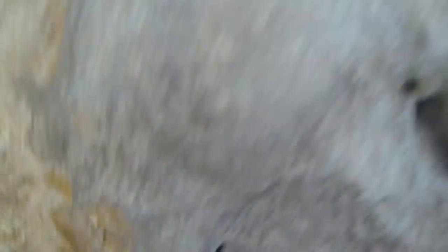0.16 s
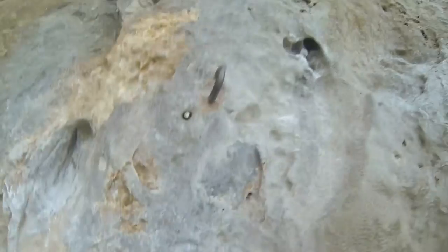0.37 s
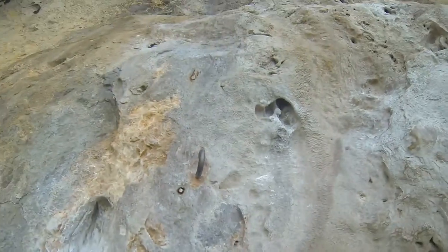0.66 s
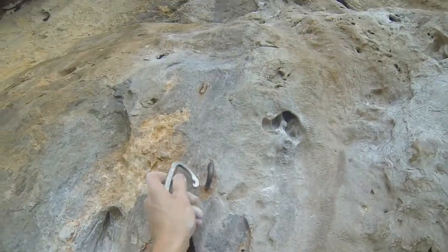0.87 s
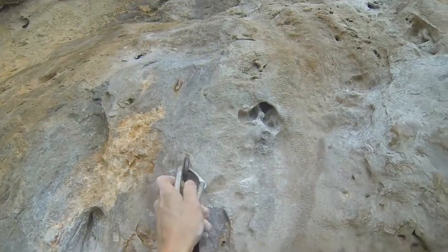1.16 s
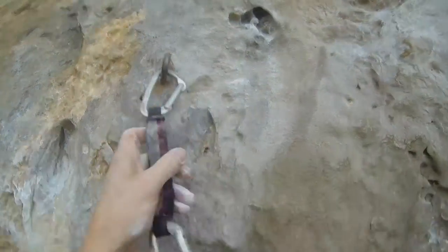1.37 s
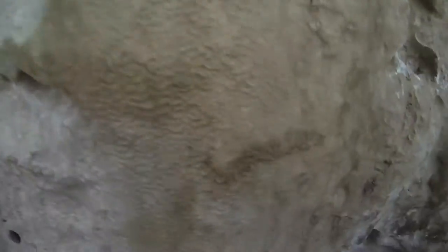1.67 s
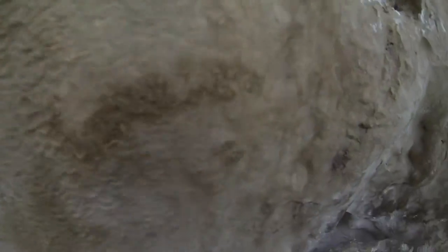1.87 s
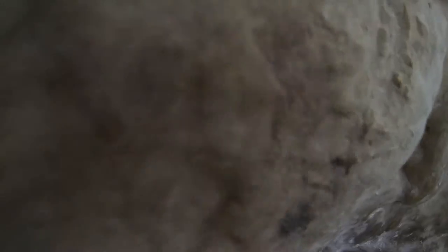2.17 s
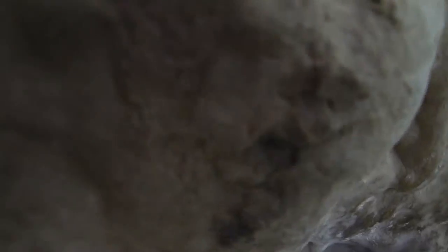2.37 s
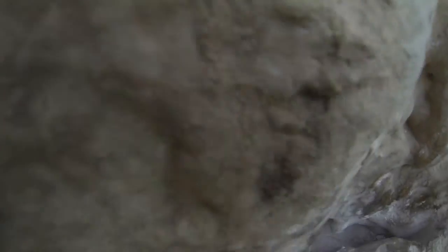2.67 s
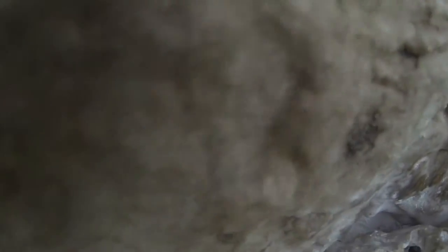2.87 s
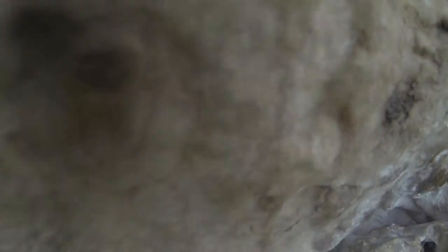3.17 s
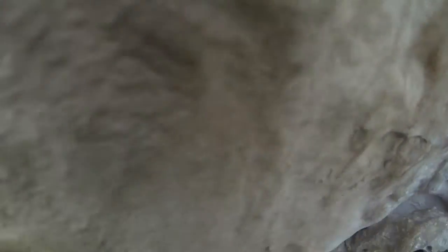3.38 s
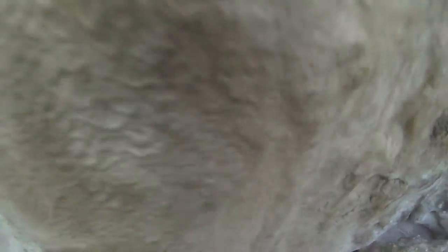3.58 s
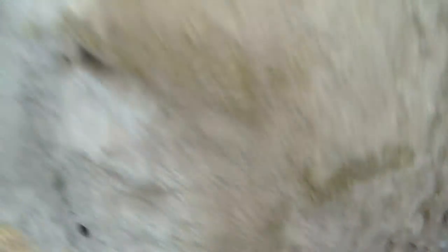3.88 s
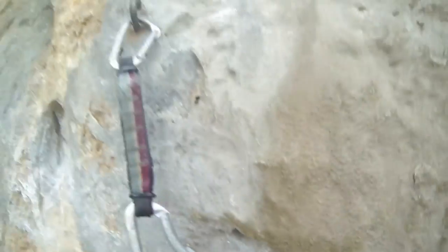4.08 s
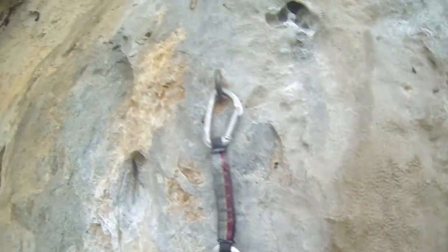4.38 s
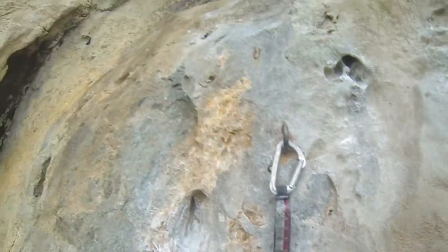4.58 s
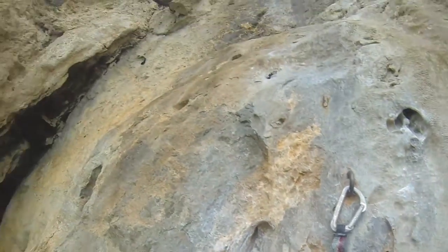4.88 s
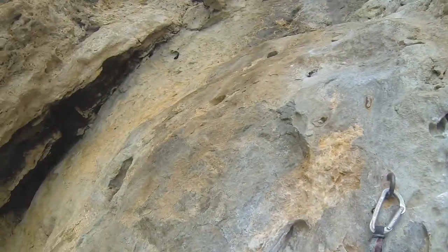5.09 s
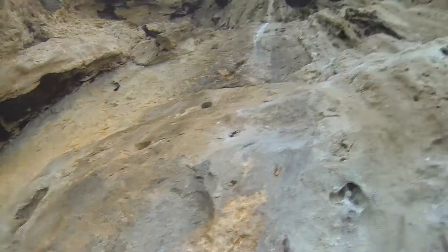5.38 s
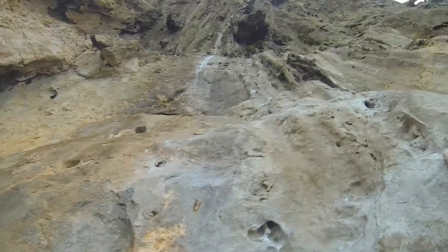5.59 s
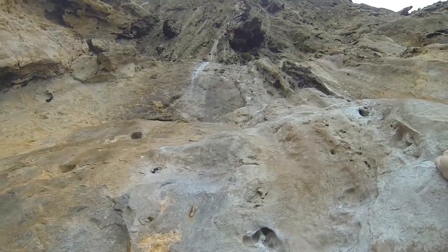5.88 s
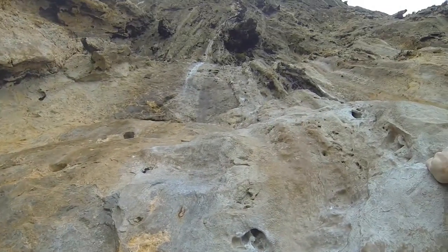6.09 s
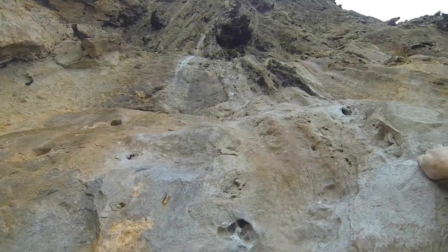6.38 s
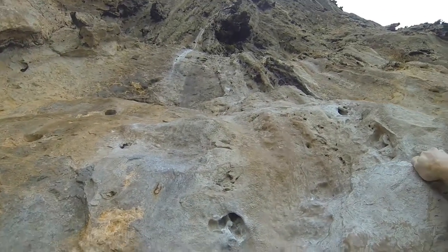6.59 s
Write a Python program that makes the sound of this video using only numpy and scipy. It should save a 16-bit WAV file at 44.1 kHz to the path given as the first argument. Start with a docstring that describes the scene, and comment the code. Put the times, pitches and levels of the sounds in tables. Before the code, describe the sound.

A body-worn microphone close to a rock face carries quiet airy hiss, a faint low hum, a thin very high whine and deep, uneven rumbling from head movement. Barely audible metal touches come at 0.1 s, clearer double clinks at 0.64 and 0.88 s, then small rattles from 0.97 s. A tight burst at 1.2 s peaks in a bright, dry carabiner snap at 1.23 s, with slight metal rubbing and a short rocky echo. A dull bump at 1.5 s and light clinks to 1.75 s follow. At 2.97 s the helmet hits rock: an abrupt, huge, distorted thump, gritty scraping to 3.1 s, and low wobbles. The background ducks and gradually recovers, with soft bumps around 3.35, 3.45 and 3.85 s. Quiet rumble continues; faint ticks at 5.6 s precede a crisp metallic clack at 5.86 s and one last small clink at 6.2 s.

```python
"""Climber clipping a bolt

A climber with a helmet camera clips a carabiner to a bolt on a rock face; struck modes clink and ring.
Head motion shakes the camera mount as a low rumble over shaped-noise wash, a faint hum and a thin whine.
The helmet knocks the rock hard once, with softer bumps, and scrapes, exciting the modes of its shell.
The hard knock overloads the input and the gain control ducks, then recovers."""
import sys
import numpy as np
from scipy import signal
from scipy.fft import rfft, irfft, next_fast_len
from scipy.io import wavfile

SR = 44100
rng = np.random.default_rng(int(sys.argv[2]) if len(sys.argv) > 2 else 0)


def output_pcm(signal):
    """Save a mono or channel-first signal as 16-bit PCM at the path in sys.argv[1].

    Samples are clipped to [-1, 1] before scaling.
    """
    pcm = np.clip(np.atleast_2d(signal).T, -1, 1) * 32767
    wavfile.write(sys.argv[1], SR, np.round(pcm).astype(np.int16))


N = 296793


def amp(db):
    """Logarithmic level: decibels become an amplitude ratio."""
    return 10 ** (np.asarray(db) / 20)


def evened(x):
    """Normalisation: scales a signal to rms 1."""
    return x / np.sqrt(np.mean(x ** 2) + 1e-20)


def curve(rows):
    """Linear interpolation: a table of start_s and value, read at every sample."""
    return np.interp(np.arange(N) / SR, *np.transpose(rows))


def coloured(points, size):
    """Spectral shaping: white noise is weighted by a table of frequency_hz and relative_db."""
    table_hz, table_db = np.transpose(points)
    whole = next_fast_len(size)
    hz = np.fft.rfftfreq(whole, 1 / SR)
    gain_db = np.interp(np.log(hz + 1), np.log(table_hz + 1), table_db)
    spectrum = rfft(rng.standard_normal(whole)) * amp(gain_db)
    return irfft(spectrum, whole)[:size]


def band(x, lo_hz, hi_hz):
    """Band-pass filtering: keeps the components between two frequencies."""
    return signal.sosfilt(signal.butter(3, [lo_hz, hi_hz], "band", fs=SR, output="sos"), x)


def add(mix, start_s, sound):
    """Superposition: adds a sound into the mix at its start time."""
    part = mix[round(start_s * SR):][:len(sound)]
    part += sound[:len(part)]


def slow(hz):
    """Random modulation: low-passed noise of rms 1 that varies up to a rate."""
    hop = 256  # samples between random steps
    steps = rng.standard_normal(N // hop + 2)
    cutoff = np.clip(hz * 2 * hop / SR, 1e-3, .9)
    smooth = evened(signal.lfilter(*signal.butter(2, cutoff), steps))
    return np.interp(np.arange(N) / hop, np.arange(len(steps)), smooth)


# spectrum of distant air and self-noise: frequency_hz, relative_db (per Hz)
WASH_SPECTRUM = [(50, -30.5), (110, -13.5), (200, -15.5), (400, -20), (700, -24), (1100, -23.5),
                 (1450, -20.5), (2000, -27.5), (2730, -33.5), (5000, -40.5), (8500, -46), (9900, -38.5),
                 (12000, -47.5), (15400, -62.5)]
# level of the wash in two bands: start_s, middle_db, low_db
WASH_LEVELS = [(0.0, -64, -61), (0.15, -61.5, -60.5), (0.4, -63.5, -65.5), (0.93, -64, -67.5),
               (1.5, -61.5, -65), (1.87, -63.5, -67), (2.4, -62, -67), (3.1, -62, -67), (3.4, -60, -63),
               (4.0, -63, -64.5), (4.6, -63.5, -68), (5.3, -63, -63.5), (6.3, -63.5, -66.5),
               (6.73, -61.5, -66)]


def wash():
    """Broadband noise: the low and middle bands of shaped noise swell gently, the treble stays steady."""
    noise = coloured(WASH_SPECTRUM, size=N)
    levels = np.array(WASH_LEVELS)
    lower = signal.sosfilt(signal.butter(2, 500, "low", fs=SR, output="sos"), noise)
    upper = signal.sosfilt(signal.butter(2, 4000, "high", fs=SR, output="sos"), noise)
    # the table levels refer to the rms of these two bands
    middle_rms = band(noise, 700, 2500).std()
    low_rms = band(noise, 220, 410).std()
    middle = (noise - upper - lower) / middle_rms
    middle = middle * amp(curve(levels[:, :2]) + 1.0 * slow(7.3))
    lower = lower / low_rms * amp(curve(levels[:, ::2]) + .8 * slow(8))
    return lower + middle + upper * amp(-62) / middle_rms


# harmonics of the hum: frequency_hz, level_db (rms)
HUM_TONES = [(91.5, -62), (183, -58.5), (274.5, -75), (366, -73.5)]


def hum():
    """Harmonic series: sine partials share one wandering pitch, and each wavers in level."""
    t = np.arange(N) / SR
    warped_s = t + np.cumsum(.002 * slow(1.5)) / SR
    partials = sum(amp(db + .8 * slow(2.4)) * np.sin(2 * np.pi * hz * warped_s) for hz, db in HUM_TONES)
    return np.sqrt(2) * partials  # rms to peak


# whine of the camera electronics: frequency_hz, level_db (rms)
WHINE_TONES = [(10645, -73), (10693, -88), (10740, -91.5), (10788, -92.5), (13189, -95.5)]


def whine():
    """Pure tones: steady high sines of constant level."""
    t = np.arange(N) / SR
    tones = sum(amp(db) * np.sin(2 * np.pi * hz * t) for hz, db in WHINE_TONES)
    return np.sqrt(2) * tones  # rms to peak


# faint pulsing from the camera: centre_hz, width_hz, level_db (rms), pulse_rate_hz
BUZZ_BAND = (5089.5, 140, -83, 47)


def buzz():
    """Amplitude modulation: regular pulses gate a narrow band of noise."""
    hz, width_hz, db, rate_hz = BUZZ_BAND
    pulses = np.cos(np.pi * rate_hz * np.arange(N) / SR) ** 4
    noise = band(rng.standard_normal(N), hz - width_hz / 2, hz + width_hz / 2)
    return amp(db) * evened(noise * pulses)


# strength of the head motion: start_s, level_db
SHAKE_LEVELS = [(0, -42), (0.12, -34), (0.62, -30), (0.74, -42), (1.0, -35), (1.45, -31), (1.68, -43),
                (1.85, -37), (2.08, -46), (2.25, -36), (2.85, -43), (4.05, -37), (4.5, -38), (5.0, -37),
                (5.4, -36), (5.7, -42), (5.9, -37), (6.1, -46), (6.25, -38), (6.73, -37.5)]
# spectrum of the head motion: frequency_hz, relative_db (per Hz)
SHAKE_SPECTRUM = [(8, -25.5), (15, -4), (27, 0.5), (43, -2), (60, -4.5), (80, -22), (105, -29), (140, -37),
                  (250, -50.5), (400, -88.5)]
# jolts that set the mount wobbling: start_s, level_db, pitch_hz, t60_s
MOUNT_JOLTS = [(0.06, -34, 115, .08), (0.21, -33, 110, .1), (2.988, 6, 30.3, 0.086), (3.05, -9, 165, .1),
               (3.076, 1, 51.6, 0.32), (3.295, -20, 109.8, .06), (3.343, -3, 44.65, 0.12),
               (3.401, -15, 48.1, .2), (3.445, -8, 52.55, 0.28), (3.70, -15.5, 40.3, 0.21),
               (3.739, -16.5, 47.3, 0.26), (3.845, -12, 52.3, 0.25)]
SHAKE_LUMP_DB, SHAKE_LUMP_HZ = 2.5, 9  # random unevenness of the motion


def mount():
    """Forced and free vibration: head motion drives a rumble, and each jolt leaves a dying wobble."""
    lumps = amp(SHAKE_LUMP_DB * slow(SHAKE_LUMP_HZ))
    out = evened(coloured(SHAKE_SPECTRUM, size=N) * lumps) * amp(curve(SHAKE_LEVELS))
    t = np.arange(SR // 3) / SR
    onset = 1 - np.exp(-(t / 0.0077) ** 2)
    for start_s, db, hz, t60_s in MOUNT_JOLTS:
        add(out, start_s, amp(db - 60 * t / t60_s) * np.sin(2 * np.pi * hz * t) * onset)
    return out


# helmet against rock: start_s, level_db, contact_ms, direction (+1 or -1)
HELMET_KNOCKS = [(1.5, -36.5, 3, 1), (2.9677, -5, .5, 1), (2.9692, 1.7, .2, -1), (2.9696, 1.7, .2, 1),
                 (2.978, -13.5, 0.45, -1), (3.295, -32, 6, 1), (3.341, -27, 6, 1), (3.443, -32, 5.3, 1),
                 (3.857, -27, 4.8, 1)]
# modes of helmet and camera case: frequency_hz, level_db, t60_s
SHELL_MODES = [(122, -4, 0.056), (260, -0.5, .03), (399.7, -2, 0.025), (620, -6.5, 0.013), (1293, -3, .014),
               (1520, -2, .016), (2250, -7, .008), (3280, -14.5, 0.006), (5400, -22, .005)]
# pressure shove of the hard knock: start_s, level_db, reversal_ms (time to the change of sign)
PRESSURE_SHOVE = (2.970, 16.37, 2.7)
# grit snapping: start_s, level_db
GRIT_TICKS = [(3.002, -33), (3.036, -33), (3.085, -30), (3.092, -34), (3.102, -37), (3.107, -31),
              (3.12, -37)]
# scraping contact: start_s, length_s, level_db
GRIT_SCRAPES = [(2.9695, .004, -24), (2.982, .014, -44), (3.025, .02, -50), (3.046, .032, -33)]
SCRAPE_RISE_S, SCRAPE_FALL_S = .004, 0.0033
GRAINS_PER_S = 2500


def helmet():
    """Modal excitation: knocks and gritty scrapes drive the shell; the hard knock shoves the microphone."""
    force, ticks, pressure = np.zeros(N), np.zeros(N), np.zeros(N)
    for start_s, db, contact_ms, direction in HELMET_KNOCKS:
        blow = np.hanning(int(contact_ms * SR / 1000) + 3)
        add(force, start_s, np.sign(direction) * amp(db) * blow / blow.sum())
    for start_s, db in GRIT_TICKS:
        add(ticks, start_s, amp(db) * np.hanning(15))
    clock = np.arange(N) / SR
    for start_s, length_s, db in GRIT_SCRAPES:
        rise = np.clip((clock - start_s) / SCRAPE_RISE_S, 0, 1)
        fall = np.exp(-np.maximum(clock - start_s - length_s, 0) / SCRAPE_FALL_S)
        pressure += amp(db) * rise * fall
    grit = rng.standard_normal(N) * (rng.random(N) < GRAINS_PER_S / SR)
    grit = signal.lfilter([.3], [1, -.87], grit)  # a soft edge dulls each grain
    force = force + pressure * grit + amp(-36) * ticks

    t = np.arange(6000) / SR
    shell = sum(amp(db - 60 * t / t60_s) * np.sin(2 * np.pi * hz * t) for hz, db, t60_s in SHELL_MODES)
    ringing = signal.oaconvolve(force, shell)[:N]
    out = ringing + amp(-12) * force + ticks  # some of the contact is heard directly

    start_s, db, reversal_ms = PRESSURE_SHOVE
    u = t * 1000 / reversal_ms
    add(out, start_s, amp(db) * (1 - u) * np.exp(-u / 1.1) * (1 - np.exp(-t / 0.00019)))
    return out


# metal rubbing on metal: start_s, length_s, level_db (rms before the swell), centre_hz
METAL_SLIDES = [(1.125, .05, -63, 3400), (1.172, .045, -60, 3800), (1.262, .06, -61, 3350),
                (5.885, .07, -58, 4600)]
SLIDE_WIDTH = 1.09  # band edges as a ratio to the centre


def slides():
    """Sliding friction: each short rub of metal is a swell of noise in a narrow band."""
    out = np.zeros(N)
    for start_s, length_s, db, hz in METAL_SLIDES:
        size = int(length_s * SR)
        hiss = evened(band(rng.standard_normal(size), hz / SLIDE_WIDTH, hz * SLIDE_WIDTH))
        swell = np.sin(np.pi * (np.arange(size) / size) ** .45) ** 2
        add(out, start_s, amp(db) * hiss * swell)
    return out


# touches of the gear: start_s, level_db, low_pitch_hz, low_lift_db, middle_pitch_hz, treble_lift_db,
# ring_db (ring against rattle)
GEAR_TOUCHES = [(0.0837, -48, 1300, 3, 3060, -7, -7), (0.137, -46.5, 1660, -1.5, 3570, -5, -4),
                (0.636, -35, 2320, 5, 5030, -5, -4), (0.643, -36, 1940, -2, 4720, -4, -6),
                (0.8767, -33.5, 1960, -3, 4730, -5, -4), (0.8814, -41.5, 2090, 1, 4690, -7, -6),
                (0.9754, -48, 1370, -1.5, 5000, -9, -3), (0.9852, -40, 1920, -7, 6200, -8.5, -1.5),
                (0.9912, -43.5, 1270, -3, 3500, -10, 1), (1.0216, -51, 2430, 1, 3060, -8, -1),
                (1.036, -39.5, 1240, -7, 3530, -11, -1), (1.1129, -45.5, 1210, -1.5, 4710, -12, -4),
                (1.1214, -46.5, 1340, -1.5, 3430, -7, -4), (1.1706, -37, 1910, -2, 3670, -6, -4),
                (1.2074, -26, 1940, 2.5, 3450, -3.5, -4), (1.2167, -26, 1250, -3, 3340, -10, -4),
                (1.2258, -15.5, 2000, -3, 3370, -4.5, -5), (1.2332, -29, 1250, 0.1, 4400, -12.5, -4),
                (1.2424, -30.5, 2160, -3, 3480, -9, -2), (1.2514, -40, 1510, 1, 3280, -12, 1),
                (1.269, -49, 2460, 4, 3310, -17, 1), (1.6106, -40, 1300, 1, 3470, -3, -4),
                (1.6401, -34.5, 1840, 3, 5900, -10, -4), (1.7392, -47, 1650, 12, 3700, -25, 4),
                (2.0027, -55, 1450, -1.5, 3500, -10, -5), (5.0275, -49, 1500, 3, 2400, -18, 0),
                (5.5958, -45, 1507, -12, 5370, 1.5, -4.5), (5.632, -41.5, 2450, -1.5, 4800, -10, -4),
                (5.862, -20.5, 1950, -3, 4650, -3.5, -3.5), (5.8824, -53, 2020, -1.5, 4400, -6, -4),
                (5.887, -35, 1943, -4, 4980, -10, -4), (5.9549, -52, 1527, -2, 3520, -9, -3.5),
                (6.2189, -41.5, 1945, -2, 5000, -9, -2)]
# modes of carabiner, gate and hanger: frequency_hz, level_db, free_t60_s
METAL_MODES = [(1246, 0, 0.069), (1440, -7.5, 0.065), (1967, -4, 0.11), (2330, -3.5, 0.07),
               (3020, -6.5, .07), (3365, -2, 0.092), (3550, -3, 0.086), (4400, -0.5, 0.06), (4800, -4, .08),
               (5170, -2.5, 0.074), (5360, -4.5, .05), (6240, 1, 0.057), (7400, -12, 0.055),
               (8060, -1.5, 0.043), (8610, -2.5, .07), (8770, -6, .07), (10840, 0.5, 0.037),
               (12600, -8, .04)]
# spectrum of the rattle: frequency_hz, relative_db
RATTLE_SPECTRUM = [(800, -39), (1200, -5.5), (1800, -18.5), (2600, -3.5), (4500, -1.5), (6200, -11.5),
                   (9000, 1.5), (13000, -6.5), (16000, -25)]
RATTLE_T60_S, GRIP_SHARE = 0.024, 0.35  # the grip leaves this share of the free ring time
TREBLE_HZ = 7000  # the treble lift acts above this


def clinks():
    """Modal synthesis: a touch rattles and rings the gear; the spot touched favours two pitches."""
    out, t = np.zeros(N), np.arange(2816) / SR
    f, mode_db, free_t60_s = np.transpose(METAL_MODES)[:, :, None]
    for start_s, db, low_hz, low_db, mid_hz, treble_db, ring_db in GEAR_TOUCHES:
        colour = []
        for hz, level_db in RATTLE_SPECTRUM:
            tilt_db = treble_db * (hz > TREBLE_HZ) - 4.0 * abs(np.log2(hz / mid_hz)) * (hz < TREBLE_HZ)
            colour.append((hz, level_db + tilt_db))
        rattle = 0.43 * evened(coloured(colour, size=len(t))) * amp(-60 * t / RATTLE_T60_S)

        # modes weaken with their distance in octaves from the favoured pitches, down to a floor
        near_low_db = low_db - 24 * abs(np.log2(f / low_hz))
        near_mid_db = -40 * abs(np.log2(f / mid_hz))
        floor_db = -14 - 9 * (f < 1700)
        near_db = np.maximum(np.maximum(near_low_db, near_mid_db), floor_db)
        near_db = np.where(f > TREBLE_HZ, treble_db - 2.5, near_db)
        near_db = near_db + 1.5 * rng.standard_normal(f.shape)
        dying = amp(mode_db + near_db - 60 * t / (GRIP_SHARE * free_t60_s))
        # loose parts chatter: each mode's level varies at random
        jangle = signal.resample(rng.standard_normal((len(METAL_MODES), 32)), len(t), axis=1)
        chatter = 0.79 + 0.55 * jangle * (1 - np.exp(-t / .006))
        tones = np.sin(2 * np.pi * (f * t + rng.random(f.shape)))
        ring = (dying * chatter * tones).sum(0)
        onset = 1 - np.exp(-t / 0.00054)
        add(out, start_s, amp(db) * (rattle + amp(ring_db) * ring) * onset)
    return out + rock_echo(out)


def rock_echo(x):
    """Diffuse reflection: rough rock returns a faint, decaying smear of the sound after 4 ms."""
    t = np.arange(SR // 6) / SR
    echo = evened(band(rng.standard_normal(len(t)), 1300, 7000)) * amp(-60 * t / 0.16) * (t > .004)
    return amp(-18.5) * signal.oaconvolve(x, echo / np.linalg.norm(echo))[:N]


def scene():
    """Superposition: the pressures of all sources add at the microphone."""
    background = wash() + hum() + whine() + buzz()
    return (background + mount() + helmet() + slides() + clinks())[None]


def record(dry):
    """Dynamic compression: gain follows the peaks a little late, so the knock clips; then a low-pass."""
    peak_db = np.minimum(20 * np.log10(abs(dry[0]) + 1e-9), 5.5)  # the detector saturates
    fall_db = np.arange(N) * 17.5 / SR  # recovers this many dB a second
    held_db = np.maximum.accumulate(peak_db + fall_db) - fall_db
    over_db = np.maximum(held_db + 12.5, 0)  # threshold at -12.5 dB
    lag = np.exp(-1 / (0.0076 * SR))  # 7.6 ms time constant
    ducked = dry * amp(-signal.lfilter([1 - lag], [1, -lag], over_db))
    taps = signal.firwin(511, 15500, window=("kaiser", 9), fs=SR)
    return signal.oaconvolve(np.clip(ducked, -1, 1), taps[None], "same")


dry = scene()
out = record(dry)
output_pcm(out)
```